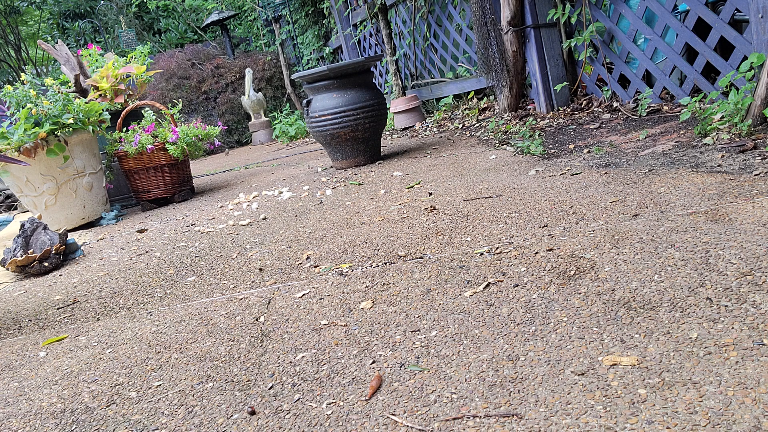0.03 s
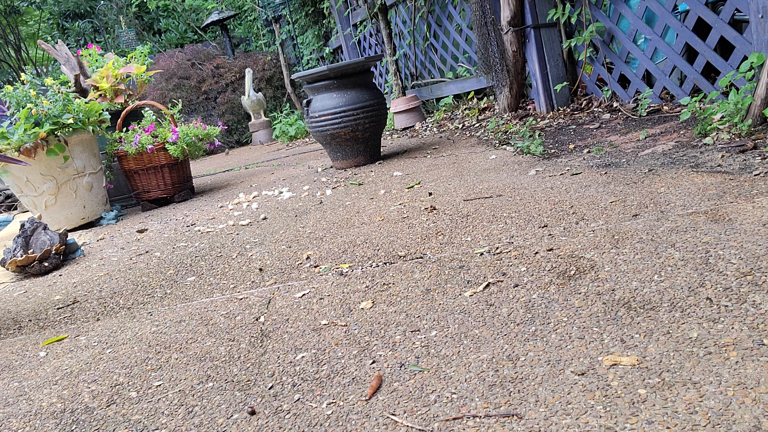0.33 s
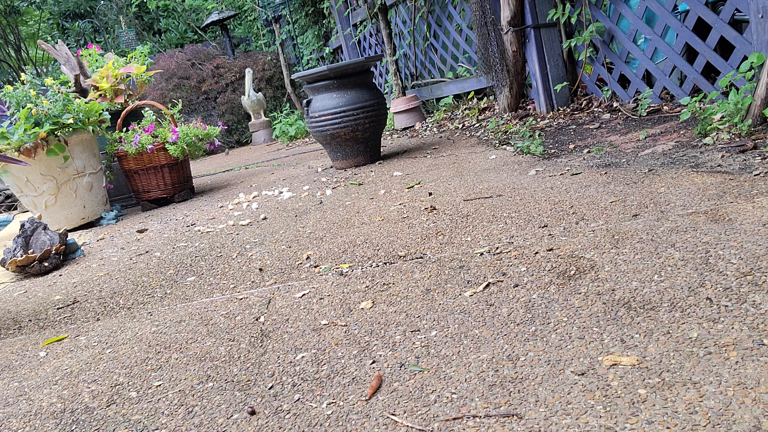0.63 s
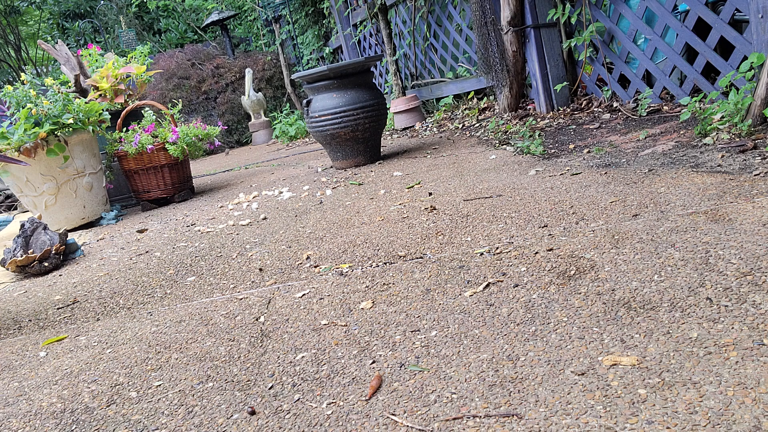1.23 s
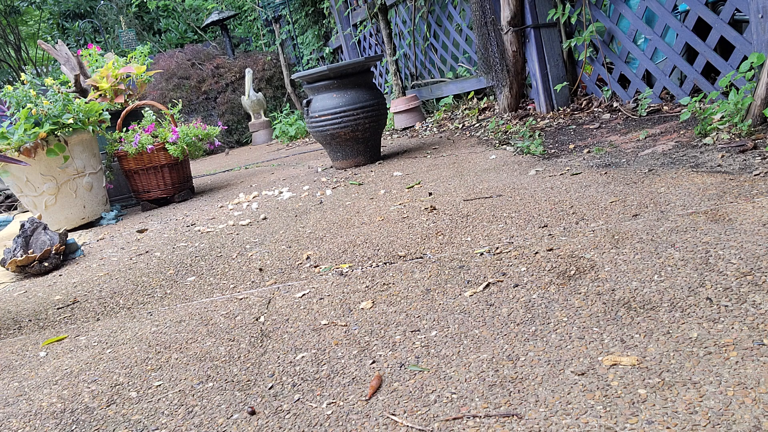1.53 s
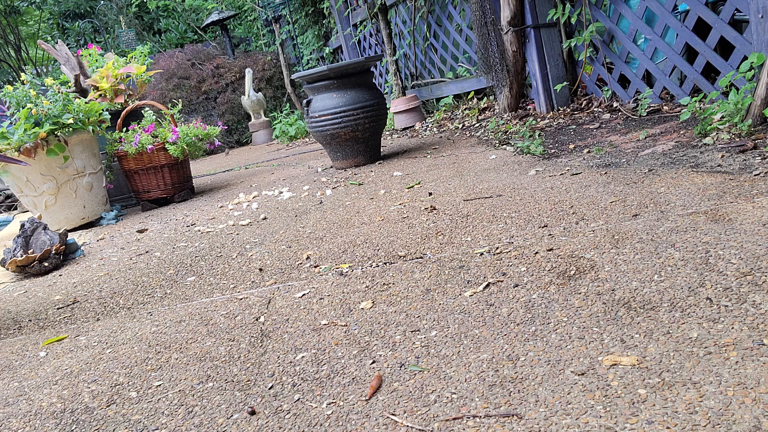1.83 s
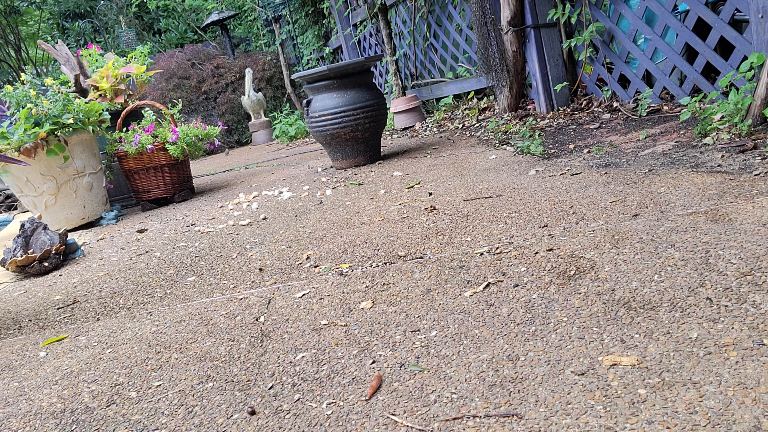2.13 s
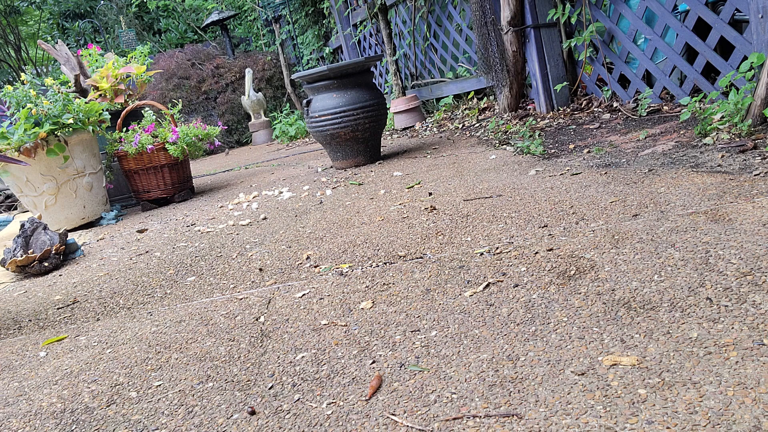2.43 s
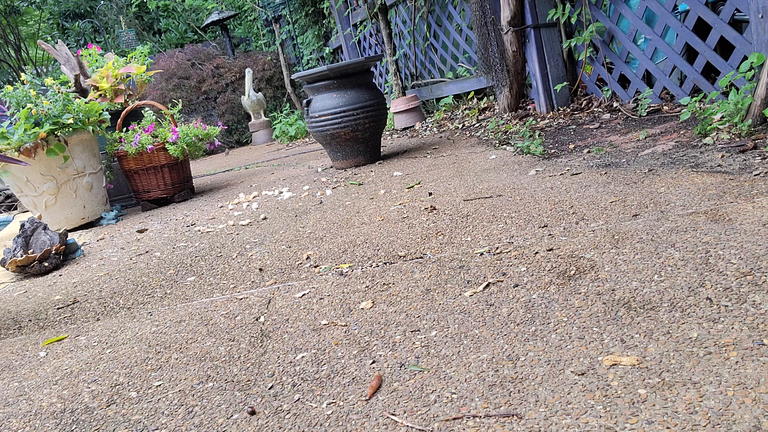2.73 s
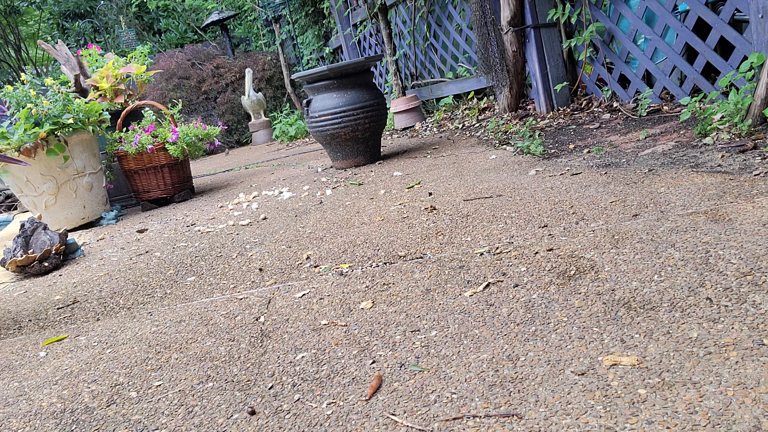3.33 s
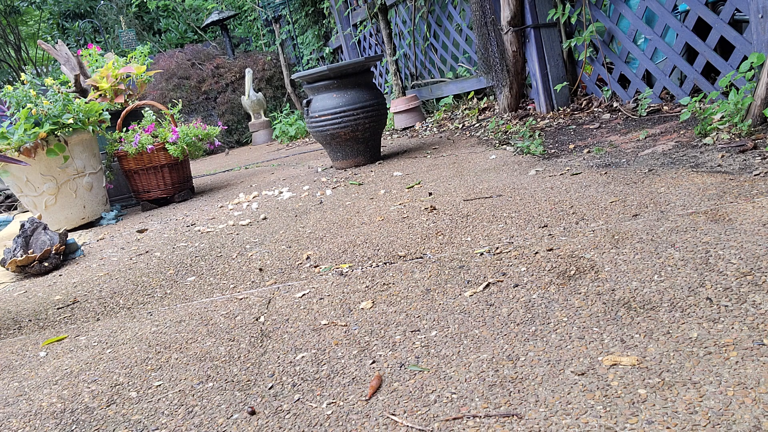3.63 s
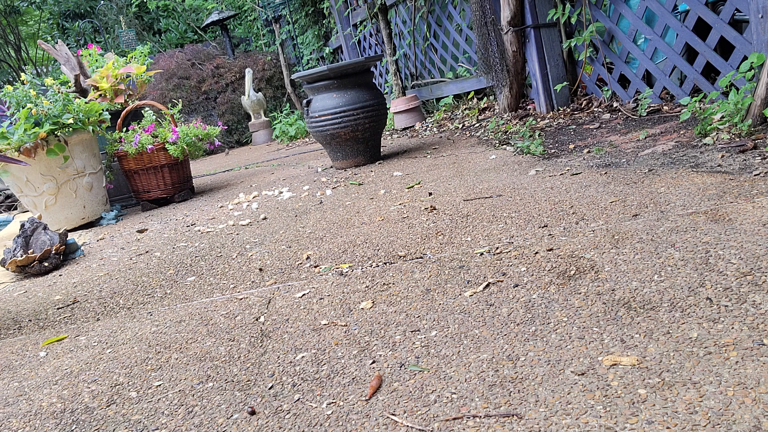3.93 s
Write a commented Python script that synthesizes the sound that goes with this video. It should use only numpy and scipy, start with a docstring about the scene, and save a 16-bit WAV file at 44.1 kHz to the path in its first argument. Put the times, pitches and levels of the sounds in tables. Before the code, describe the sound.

A toad gives one high, buzzy trill from about 1.3 to 2.2 seconds, starting hoarse and holding its pitch as the buzz slows slightly. Low distant traffic and a soft hiss of leaves continue for all four seconds in the yard. Faint bird chirps, soft distant knocks and tiny ticks in dry litter are scattered mostly before and after the trill, with one small sharp snap near 2.6 seconds.

```python
"""A garden yard, where a toad gives one buzzy, slowing trill. A train of pulses excites its throat,
the vocal sac resonates near 2 kHz, and a tone carries on from pulse to pulse. Reflections from paving
and fences colour the trill differently on each side. Behind it lie broadband noises (far traffic,
leaves), thin gliding bird chirps and twitters, and decaying transients: soft distant knocks,
tiny ticks in the dry litter and one sharp snap."""
import sys
import numpy as np
from scipy import signal
from scipy.fft import rfft, irfft, next_fast_len
from scipy.io import wavfile
from scipy.ndimage import uniform_filter1d, map_coordinates

SR = 44100
rng = np.random.default_rng(int(sys.argv[2]) if len(sys.argv) > 2 else 0)


def persist_wave(psi):
    """Save psi, clipped to +-1, as 16-bit WAV."""
    counts = np.round(np.clip(psi, -1, 1) * 32767).astype(np.int16)
    wavfile.write(sys.argv[1], SR, np.atleast_2d(counts).T)


N = 176400

# Spectra of the steady noises: frequency_hz, relative_density_db
TRAFFIC_SPECTRUM = [(13, -49), (22, -19), (60, 0), (108, 3.5), (134, -0.5), (275, -18.5), (400, -24.5),
                    (520, -64), (880, -120)]
HISS_SPECTRUM = [(180, -31), (300, -11.5), (420, -4), (700, -3), (900, -5.5), (1100, -2.5), (1750, -2.5),
                 (2400, -5.5), (3100, -4), (4100, -9), (5100, -7.5), (5850, -8), (6400, -15.5), (8000, -14),
                 (9300, -13.5), (11000, -16.5), (15800, -16)]
RUSTLE_SPECTRUM = [(900, -39), (2000, -9.5), (3100, -3.5), (4200, -7.5), (6000, -16.5), (8000, -25)]
# Likeness of those noises at left and right: frequency_hz, coherence
COHERENCE = [(60, 1), (160, 0.99), (270, 0.87), (450, 0.91), (740, 0.63), (1220, 0.69), (2200, 0.13),
             (6000, 0.013)]
# Envelope of the rustle: time_s, level_db
RUSTLE_LEVEL = [(0, -94), (.3, -64.5), (.65, -70), (.8, -60), (1.05, -77), (1.5, -62), (2.05, -62),
                (2.62, -65), (2.76, -59.5), (3.0, -64), (3.2, -75), (3.35, -61), (3.65, -63.5), (3.85, -61),
                (4, -58)]
# Bird whistles: start_s, length_s, start_hz, end_hz, level_db
CHIRPS = [(0.0, 0.094, 6300, 5980, -61.5), (0.049, 0.023, 4890, 5130, -52), (0.212, 0.032, 4700, 4800, -58),
          (0.607, 0.031, 4380, 4430, -53.5), (1.282, 0.058, 6780, 6600, -63),
          (2.276, 0.04, 7040, 6980, -61), (2.32, 0.046, 7280, 7230, -60), (2.366, 0.033, 7180, 6530, -54),
          (3.284, 0.045, 4590, 4530, -57), (3.548, 0.071, 9520, 9340, -61)]
# Calls of farther birds: start_s, level_db, centre_hz
TWITTERS = [(.07, -63, 5700), (.52, -64, 5140), (.77, -56, 5300), (2.24, -52.5, 5000), (2.55, -56, 5040),
            (2.735, -55, 5400), (3.06, -59, 5500), (3.28, -60, 5200), (3.93, -53.5, 5400)]
# Litter crackle, then far bird chatter: count, base_level_db, lowest_hz, highest_hz, time_constant_s
SPECKS = [(70, -65, 2500, 14000, .0004), (150, -73, 4600, 5900, .003)]
# Distant knocks and scuffs: start_s, level_db, centre_hz, t60_s, width_octaves
KNOCKS = [(0.1, -57.5, 580, 0.35, 0.12), (0.178, -51, 363, 0.19, 0.29), (.22, -58.5, 1250, 0.15, 0.25),
          (1.02, -54, 1110, 0.21, 0.19), (1.881, -59, 550, 0.35, 0.056), (2.139, -56.5, 514, 0.21, 0.13),
          (2.225, -51, 430, 0.13, 0.13), (2.44, -48.5, 716, 0.12, 0.16), (2.589, -57.5, 1070, 0.22, 0.19),
          (3.1, -52.5, 2030, 0.18, 0.47), (3.143, -58.5, 1400, 0.14, 0.12), (3.442, -54, 505, 0.16, 0.42),
          (3.473, -53.5, 1460, 0.24, 0.41), (3.618, -50, 660, 0.11, 0.2), (3.655, -56.5, 796, 0.15, 0.56),
          (3.959, -53, 1370, 0.39, 0.35)]
# Ticks in dry litter: start_s, level_db, centre_hz, t60_s, left_minus_right_db
TICKS = [(0.271, -49.5, 3140, 0.087, 0), (0.539, -50.5, 3270, 0.065, 6), (0.612, -58.5, 7000, 0.15, -3),
         (1.405, -55, 9100, 0.043, 7), (2.3, -49.5, 13100, 0.017, 2), (2.46, -52.5, 3900, 0.12, 4),
         (2.695, -57, 13000, 0.092, 0), (2.768, -49.5, 3030, 0.053, 0), (3.565, -46.5, 13000, 0.029, -12),
         (3.618, -57.5, 9000, 0.12, -5), (3.695, -60, 12000, .03, -2)]
# Repetition rate of the toad's pulses: time_s, rate_hz
PULSE_RATE = [(1.3, 170), (1.5, 167), (1.63, 161), (1.8, 155), (1.9, 149), (2.03, 148), (2.11, 143),
              (2.19, 135)]
# Envelope of the trill at its source: time_s, level_db
EFFORT = [(1.3, -72), (1.372, -48), (1.44, -43.7), (1.51, -46), (1.75, -46), (1.815, -48), (1.87, -44.5),
          (2.12, -45.8), (2.178, -43.2), (2.2, -55), (2.26, -65)]
# Ringing note of a pulse, rising at first as the throat fills: time_s, pitch_hz
RING_PITCH = [(1.32, 1770), (1.38, 2050), (1.47, 2095), (2.19, 1976), (2.25, 1930)]
# Tone sustained between pulses: time_s, pitch_hz
TONE_PITCH = [(1.32, 1900), (1.385, 2025), (1.44, 2085), (1.54, 2112), (1.63, 2120), (1.78, 2102),
              (1.84, 2118), (1.91, 2100), (1.99, 2120), (2.06, 2106), (2.2, 2106), (2.26, 1900)]
# Bands that the yard's echoes reinforce on each side: centre_hz, width_hz, gain_db
LEFT_BANDS = [(1790, 45, -7), (1925, 60, 1), (2010, 60, -2), (2195, 60, -1)]
RIGHT_BANDS = [(1840, 40, -4), (1960, 45, 3), (2025, 35, -2), (2165, 40, -3), (2240, 60, -7)]

TIME = np.arange(N) / SR
TRILL_START_S, TRILL_END_S = EFFORT[0][0], EFFORT[-1][0]


def amp(db):
    return 10 ** (np.asarray(db) / 20)


def unit_rms(x):
    return x / np.sqrt(np.mean(x ** 2) + 1e-20)


def at_frequency(points, hz):
    """Interpolation on a logarithmic frequency axis."""
    knots_hz, values = np.transpose(points)
    return np.interp(np.log(hz + 1), np.log(knots_hz + 1), values)


def at_time(points, t):
    """Linear interpolation in time."""
    return np.interp(t, *np.transpose(points))


def wobble(rate_hz):
    """Smooth random modulation: a spline through Gaussian knots."""
    return map_coordinates(rng.standard_normal(int(N * rate_hz / SR) + 4), [TIME * rate_hz])


def filtered(x, response):
    """Linear filtering: the spectrum times a frequency response."""
    size = next_fast_len(N + SR // 2)
    return irfft(rfft(x, size) * response(np.fft.rfftfreq(size, 1 / SR)), size)[..., :N]


def pan(db):
    """Gains for a level difference; positive favours the left."""
    return amp(np.array([[db], [-db]]) / 2)


def lead(x, seconds):
    """Arrival-time difference as linear phase; positive reaches the left first."""
    return filtered(x, lambda hz: np.exp(1j * np.pi * hz * seconds * np.array([[1], [-1]])))


def diffuse_noise(spectrum, patchy_db):
    """Partly coherent stereo noise of unit rms, its gain uneven over time and frequency."""
    cells = signal.stft(rng.standard_normal((2, N)), nperseg=512)[2]
    patches = uniform_filter1d(rng.standard_normal(cells.shape[1:]), size=5, axis=0)
    patches = uniform_filter1d(patches, size=6, axis=1)
    noise = signal.istft(cells * amp(patchy_db * unit_rms(patches)), nperseg=512)[1][:, :N]

    def mid_side_gains(hz):
        angle = np.arccos(np.clip(at_frequency(COHERENCE, hz), -1, 1)) / 2
        return amp(at_frequency(spectrum, hz)) * [np.cos(angle), np.sin(angle)]

    mid, side = filtered(noise, mid_side_gains)
    return unit_rms(np.array([mid + side, mid - side]))


def burst(start_s, centre_hz, octaves, t60_s, rise_s):
    """A transient: a band of stereo noise with exponential rise and decay."""
    age = np.maximum(TIME - start_s, 0)
    band = lambda hz: 1 / (1 + (np.log2((hz + 1) / centre_hz) / octaves / 2) ** 2) ** 2
    left, right, shared = filtered(rng.standard_normal((3, N)), band)
    envelope = (1 - np.exp(-age / rise_s)) * amp(-60 * age / t60_s)
    return envelope * unit_rms(np.array([left, right]) + shared)


def yard_echoes(x, t60_s=.16, gap_s=.006):
    """Reverberation: scattering from fences and pots gives each side its own decaying tail."""
    t = np.arange(SR // 2) / SR
    tail = rng.standard_normal((2, len(t))) * amp(-60 * t / t60_s) * (t > gap_s)
    return signal.fftconvolve(np.atleast_2d(x), tail / np.linalg.norm(tail[0]), axes=1)[:, :N]


def traffic():
    """Low-frequency noise: the steady rumble of far traffic."""
    return amp(-48) * pan(-1.14) * diffuse_noise(TRAFFIC_SPECTRUM, patchy_db=.5)


def leaves():
    """Amplitude-modulated noise: a broad fluttering hiss and a swelling rustle near 3 kHz."""
    hiss_db = -56.5 + .5 * wobble(5.15) + .85 * wobble(35.13)
    hiss = amp(hiss_db) * diffuse_noise(HISS_SPECTRUM, patchy_db=2.5)
    rustle_db = at_time(RUSTLE_LEVEL, TIME) + 2 * wobble(24.55)
    return hiss + amp(rustle_db) * diffuse_noise(RUSTLE_SPECTRUM, patchy_db=3)


def bird_chirps():
    """Frequency modulation: each far whistle is a quavering glide, weaker than its echoes."""
    whistles = np.zeros(N)
    quaver = 1 + .018 * wobble(700)
    for start_s, length_s, start_hz, end_hz, db in CHIRPS:
        progress = np.clip((TIME - start_s) / length_s, 0, 1)
        pitch_hz = (start_hz + (end_hz - start_hz) * progress) * quaver
        whistles += amp(db) * np.sin(np.pi * progress) * np.sin(2 * np.pi * np.cumsum(pitch_hz) / SR)
    return amp(-4) * whistles + yard_echoes(whistles)


def crackle_and_chatter():
    """Damped oscillations at random times, pitches and sides: faint litter and far birds."""
    rings = np.zeros((2, N))
    for count, base_db, low_hz, high_hz, life_s in SPECKS:
        for when, pitch, side, size in rng.random((200, 4))[:int(count)]:
            start = int(when * N)
            span = np.arange(start, min(N, start + SR // 10))
            age = TIME[span] - TIME[start]
            pitch_hz = low_hz * (high_hz / low_hz) ** pitch
            ring = age / life_s * np.exp(1 - age / life_s) * np.sin(2 * np.pi * pitch_hz * age)
            level_db = base_db - 1.8 * np.log(1 - size)  # exponential spread: a few stand out
            rings[:, span] += amp(level_db) * pan(10 * (side - .5)) * ring
    return rings + amp(4) * yard_echoes(rings)


def bird_twitters():
    """Scattering by trees blurs farther calls into narrow bands of noise."""
    return sum(amp(db) * burst(start_s, hz, octaves=.08, t60_s=.25, rise_s=.02)
               for start_s, db, hz in TWITTERS)


def distant_knocks():
    """Exponential decay: dull bursts of noise with weak reverberation."""
    knocks = sum(amp(db) * burst(start_s, hz, octaves, t60_s, rise_s=.0025)
                 for start_s, db, hz, t60_s, octaves in KNOCKS)
    return knocks + amp(-14) * yard_echoes(knocks)


def litter_ticks():
    """Treble transients in nearby dry litter, each placed by a level difference."""
    return sum(amp(db) * pan(side_db) * burst(start_s, hz, octaves=.49, t60_s=t60_s, rise_s=.0011)
               for start_s, db, hz, t60_s, side_db in TICKS)


def throat_pulses(cycles, rise_s=.00098, jitter_s=.00025, scatter_db=2, sac_hz=2110, sac_width_hz=700):
    """Source and filter: each pulse rings the throat, and the vocal sac passes a narrow band."""
    voice = np.zeros(N)
    starts = np.interp(np.arange(1, int(cycles[-1])), cycles, TIME)
    for start_s, (late, size) in zip(starts, rng.standard_normal((1000, 2))):
        if TRILL_START_S < start_s < TRILL_END_S:
            span = int(start_s * SR) + np.arange(SR // 60)
            age = np.maximum(TIME[span] - start_s - jitter_s * late, 0)
            envelope = (age / rise_s) ** 2 * np.exp(2 * (1 - age / rise_s))
            ring = np.sin(2 * np.pi * at_time(RING_PITCH, start_s) * age)
            voice[span] += amp(at_time(EFFORT, start_s) + scatter_db * size) * envelope * ring
    return filtered(voice, lambda hz: 1 / (1 + 2j * (hz - sac_hz) / sac_width_hz))


def throat_tone(cycles, depth=.68, swing_rad=.15, settle_s=.07):
    """Amplitude and phase modulation at the pulse rate; phase noise makes the onset hoarse."""
    beat = 2 * np.pi * cycles
    rough_db, slip, swell_db = 1.6 * wobble(150), wobble(150), wobble(25)
    slip_rad = .24 + 2.2 * np.exp(-np.maximum(TIME - TRILL_START_S, 0) / settle_s)
    calling = (TIME > TRILL_START_S) & (TIME < TRILL_END_S)
    envelope = amp(at_time(EFFORT, TIME) + 1.7 + rough_db + swell_db) * calling
    carrier_rad = 2 * np.pi * np.cumsum(at_time(TONE_PITCH, TIME)) / SR
    phase = carrier_rad + slip_rad * slip - swing_rad * np.sin(beat)
    return envelope * (1 + depth * np.cos(beat)) * np.sin(phase)


def yard_colour(x, bands, direct_db=-13):
    """Interference: reflections reinforce narrow bands. The rms level is preserved."""
    def response(hz):
        return amp(direct_db) + sum(amp(db) * 1j * hz * width / (centre ** 2 - hz ** 2 + 1j * hz * width)
                                    for centre, width, db in bands)

    return x.std() * unit_rms(filtered(x, response))


def toad():
    """Periodic excitation: one slowing pulse rate drives buzz and tone, and the yard echoes both."""
    rate_hz = at_time(PULSE_RATE, TIME) * (1 + .008 * wobble(40))
    cycles = np.cumsum(rate_hz) / SR
    pulses, tone = throat_pulses(cycles), throat_tone(cycles)
    buzz = np.array([amp(6) * yard_colour(pulses, LEFT_BANDS), amp(8) * yard_colour(pulses, RIGHT_BANDS)])
    echoes = amp(-9) * yard_echoes(buzz + tone)
    return lead(buzz, seconds=-.00015) + pan(2.6) * lead(tone, seconds=-.00005) + echoes


def snap():
    """Heavy damping: one sharp, high burst dies within milliseconds."""
    return amp(-39) * burst(start_s=2.609, centre_hz=9400, octaves=.14, t60_s=.007, rise_s=.0011)


def scene():
    """Superposition of calls and small sounds on a background that reaches the left first."""
    calls = toad() + bird_chirps() + bird_twitters()
    small_sounds = distant_knocks() + litter_ticks() + snap() + crackle_and_chatter()
    return calls + small_sounds + lead(traffic() + leaves(), seconds=.00028)


def record(dry):
    """Band limiting: an ideal low-pass filter at 15.8 kHz."""
    return filtered(dry, lambda hz: hz < 15800)


dry = scene()
out = record(dry)
persist_wave(out)
```